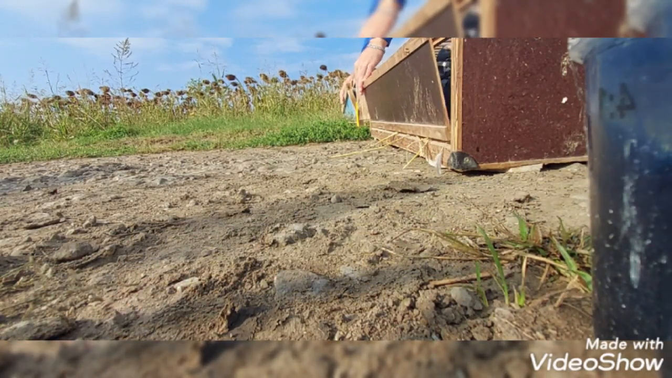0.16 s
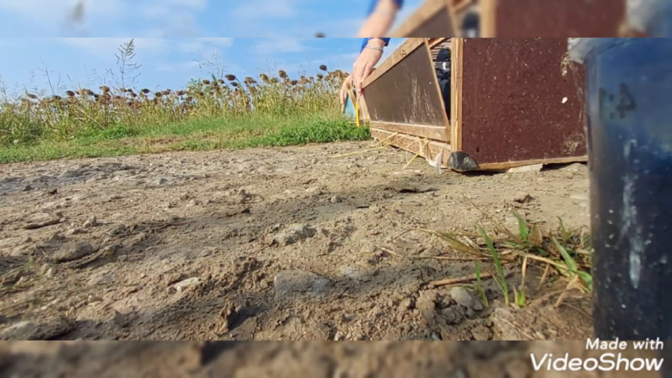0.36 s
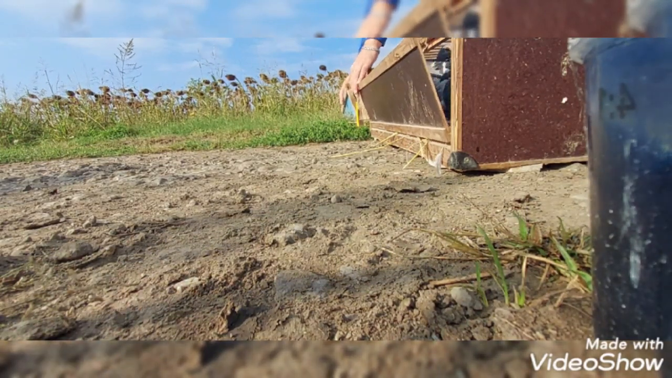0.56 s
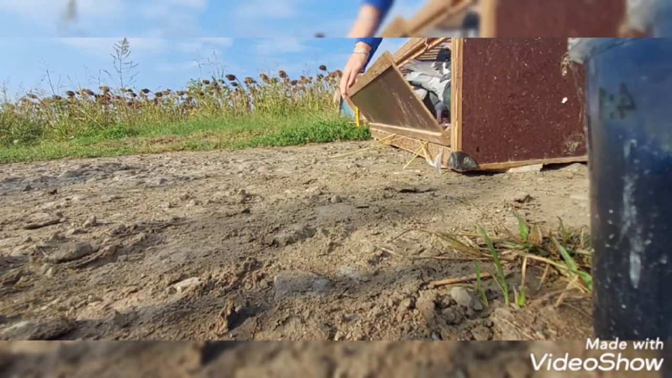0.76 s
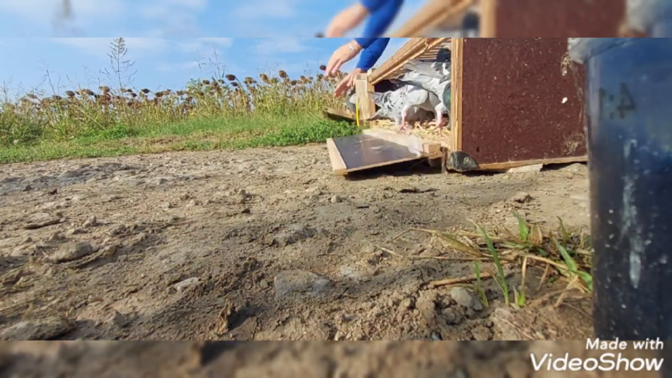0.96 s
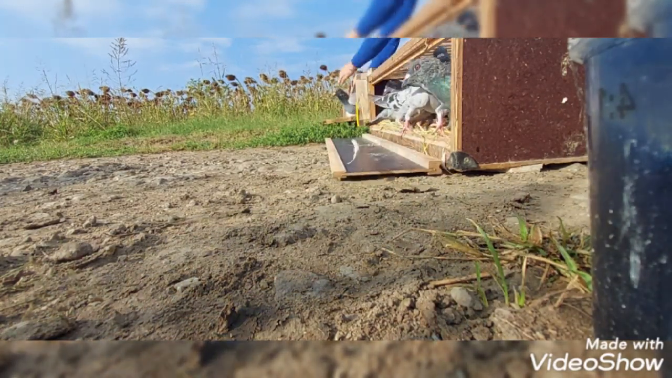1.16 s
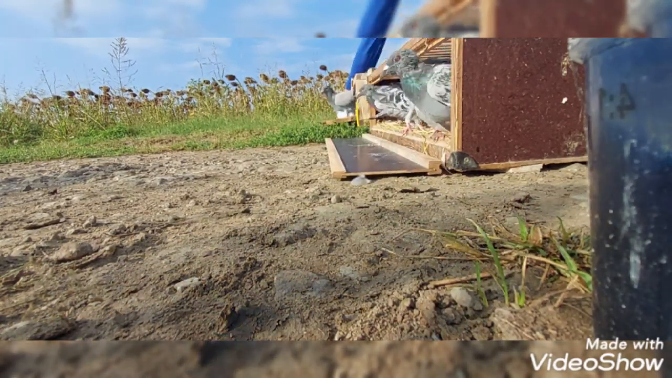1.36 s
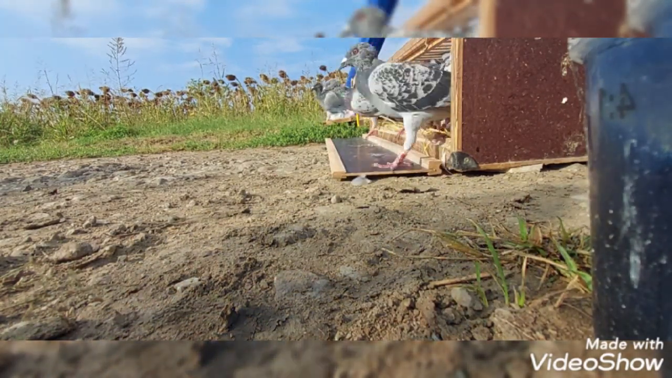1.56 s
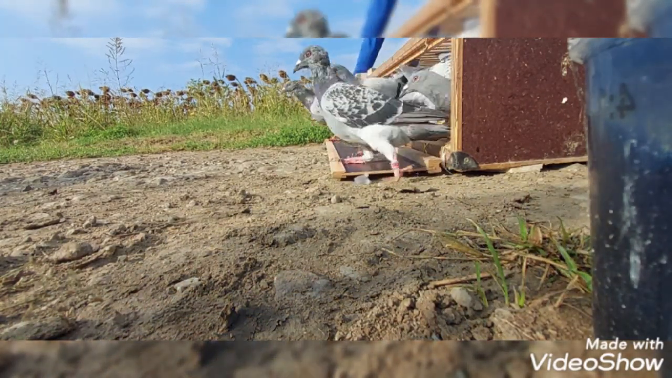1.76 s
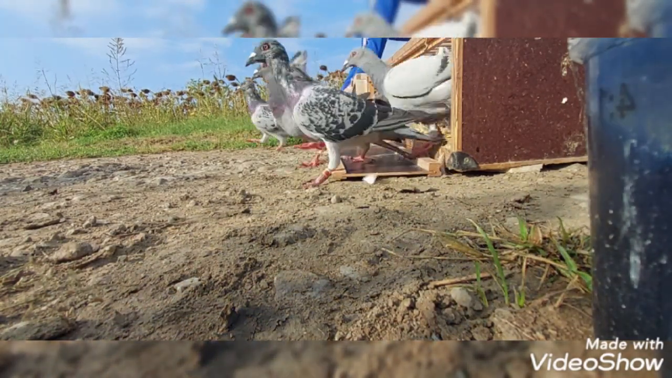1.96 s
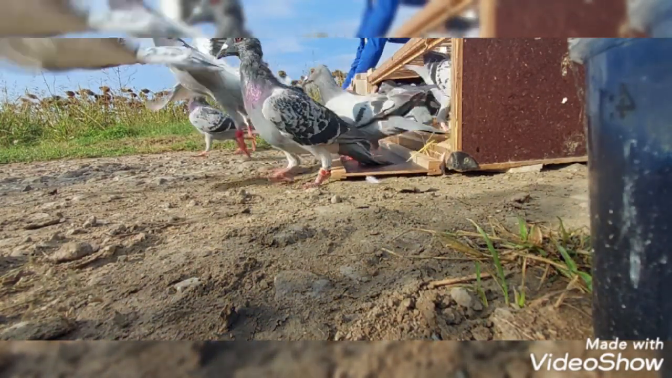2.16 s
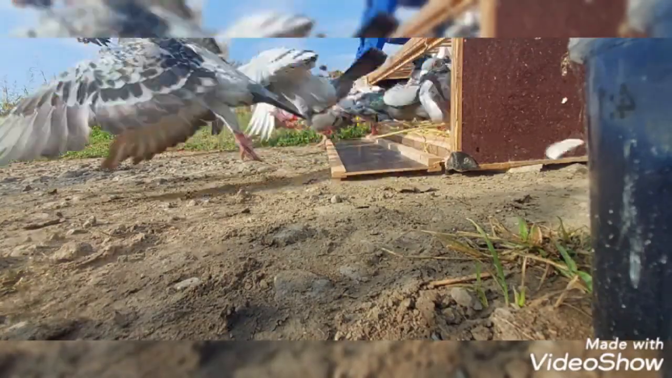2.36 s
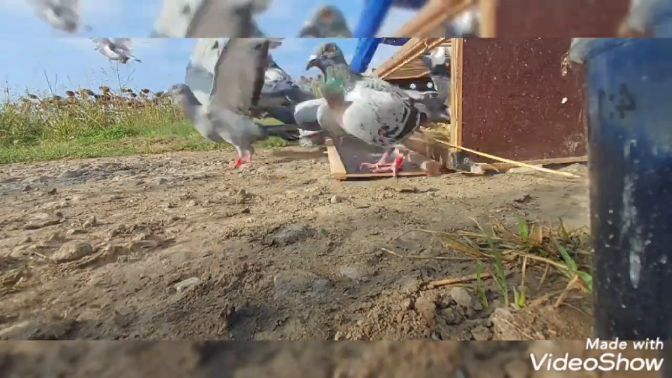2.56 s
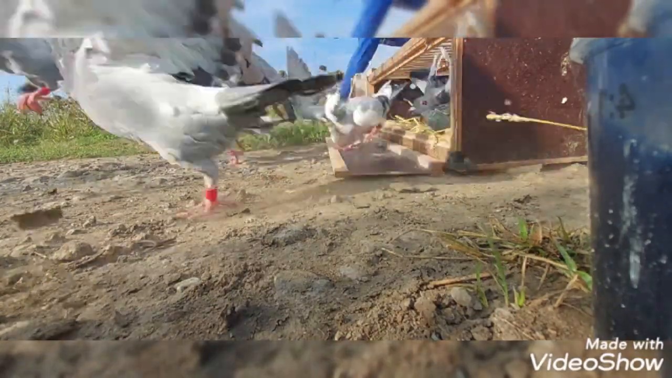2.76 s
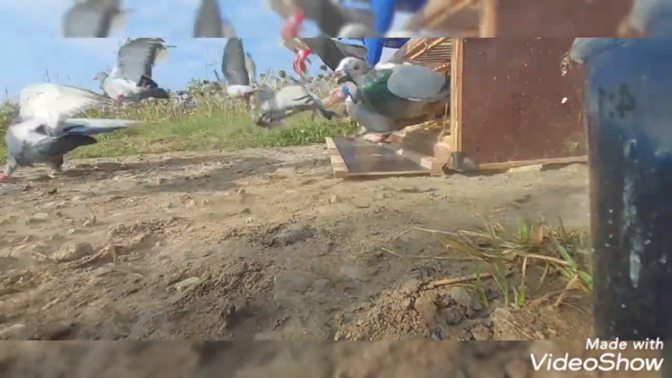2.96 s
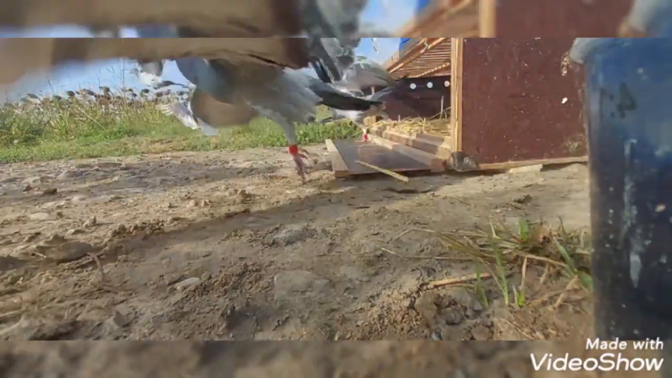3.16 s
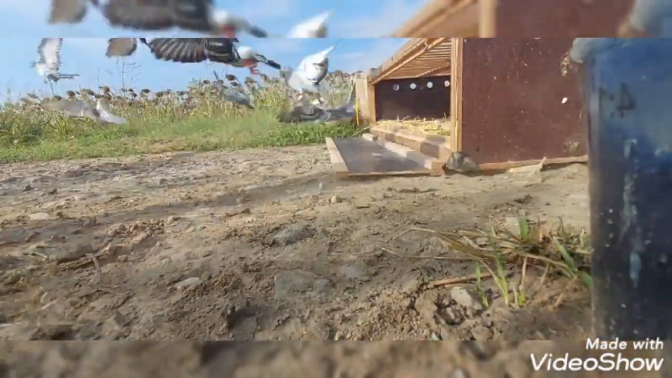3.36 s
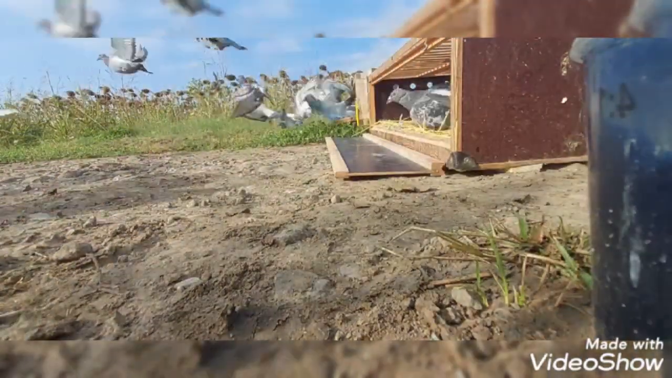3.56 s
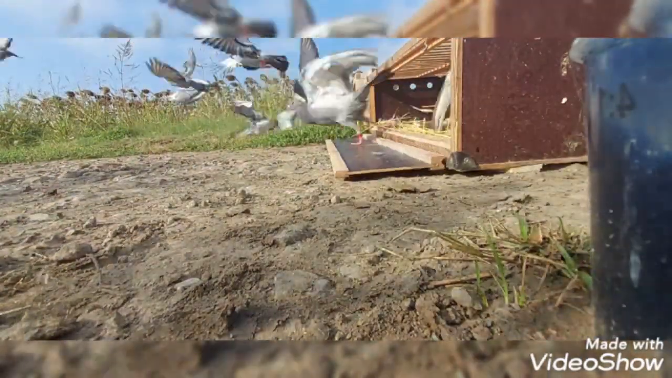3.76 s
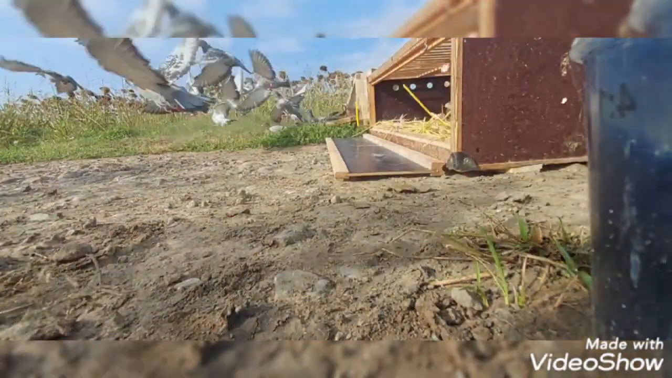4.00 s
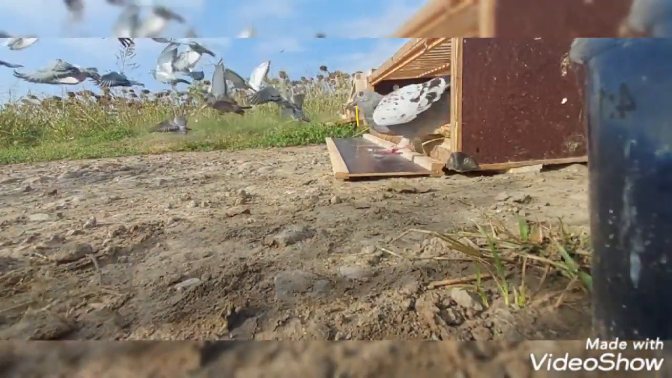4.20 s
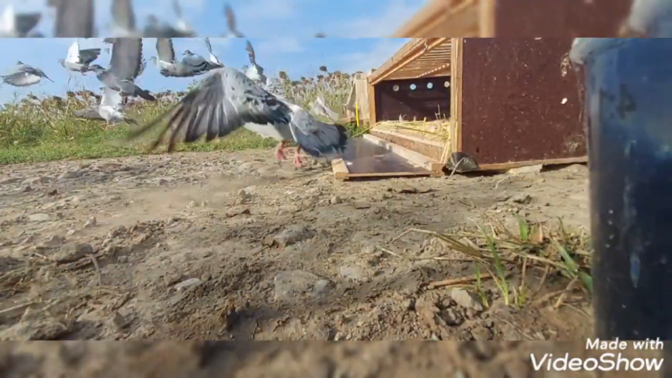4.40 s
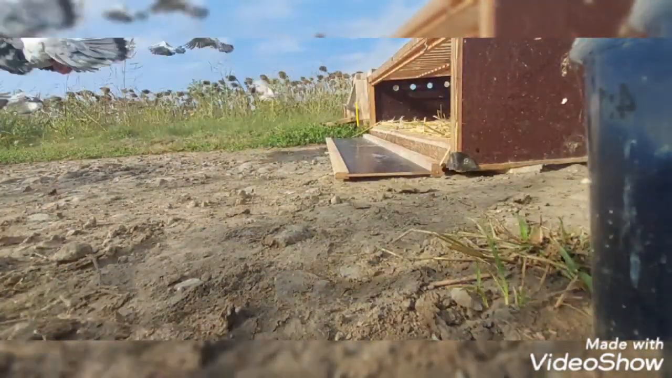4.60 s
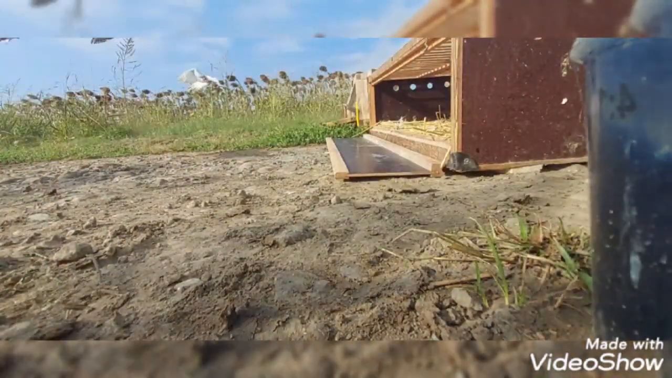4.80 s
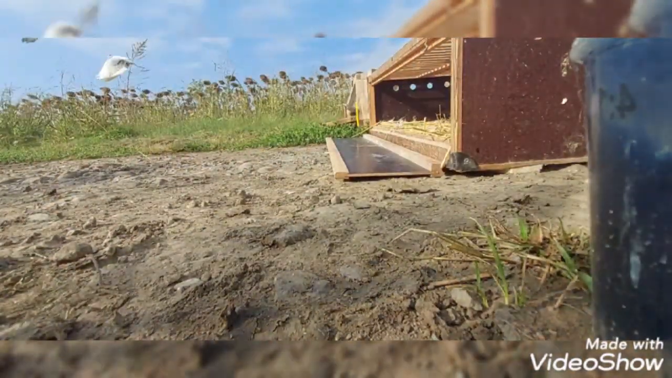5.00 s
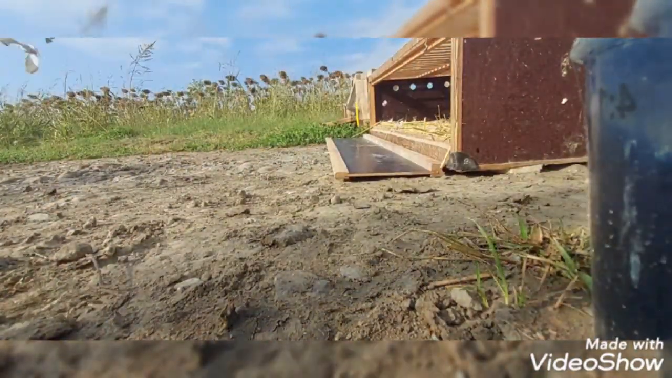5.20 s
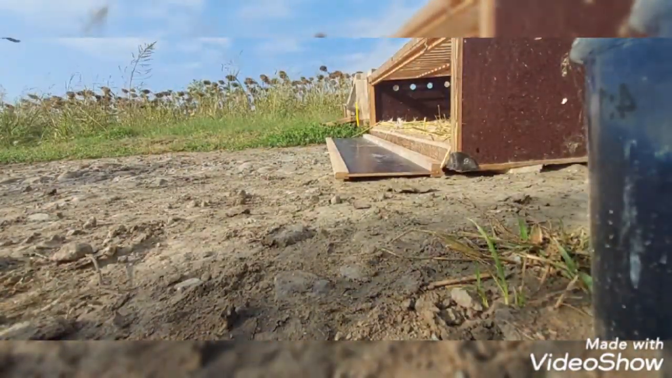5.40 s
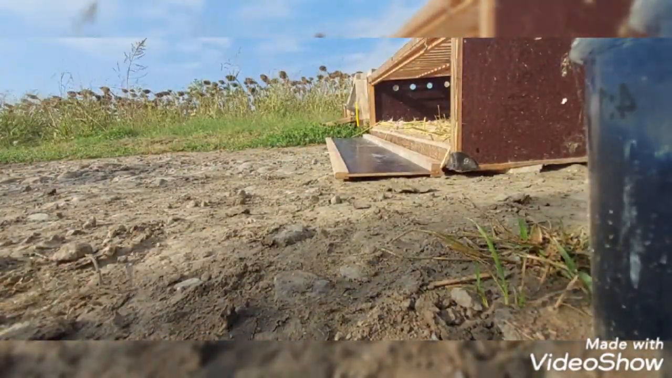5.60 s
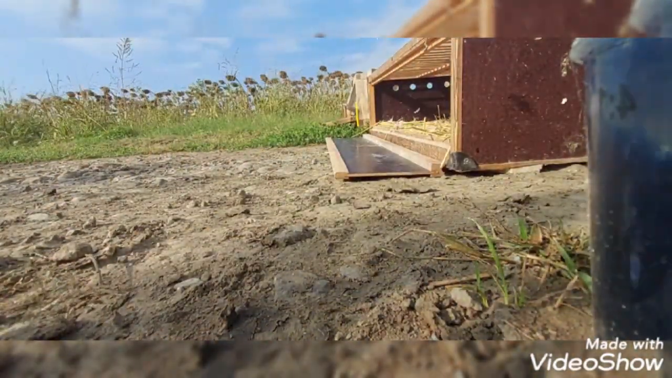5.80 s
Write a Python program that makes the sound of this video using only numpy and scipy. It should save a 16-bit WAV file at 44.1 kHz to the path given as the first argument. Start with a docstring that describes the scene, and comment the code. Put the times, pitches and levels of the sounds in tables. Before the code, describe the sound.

A close stereo pickup in an open field, with faint low wind and soft airy hush. A light wooden knock comes at 0.1 s, then the crate door scrapes from 0.7 s, with a firm knock at 0.8 s. At about 1.0 s the board clacks hard on the soil, bouncing and rattling briefly with a hollow crate resonance. From 1.3 to 2.1 s, feet knock on wood, claws scratch and birds rustle. Around 2.2 s the pigeons burst out: hard wing slaps, papery feather flutter and a heavy push of air, strongest near 2.4 s. Overlapping waves of wingbeats continue through 3 and 4 s, gusts buffeting the microphone, brighter and stronger on the left, more muffled on the right. Late departures flap near 4.5 to 5 s, with small snaps and pattering grit. A last weak gust at 5.3 s and soft scuffs lead to near quiet by 5.8 s.

```python
"""Racing pigeons leave a wooden crate on bare ground, heard from close by on two ports, the right one facing away.
First the low rumble of a light wind and the field's hush; then the door, as damped board modes, knocks, scrapes
and drops on the soil. Claws scratch the wood as filtered noise bursts while the birds jostle, then the flock takes
off in waves with a low push of air: grainy noise makes feathers swish and flutter, short pulses and bursts make
slaps and snaps, and each near downstroke throws a gust of shaped turbulence on both ports, until all dies down."""
import sys
import numpy as np
from scipy import signal
from scipy.fft import rfft, irfft, next_fast_len
from scipy.io import wavfile
from scipy.ndimage import uniform_filter1d

SR = 44100
rng = np.random.default_rng(int(sys.argv[2]) if len(sys.argv) > 2 else 0)


def unload_wav(signal):
    """Save mono or channel-first audio to the path in sys.argv[1] as 16-bit WAV at rate SR, clipped to [-1, 1]."""
    wavfile.write(
        sys.argv[1],
        SR,
        np.round(np.clip(np.atleast_2d(signal).T, -1, 1) * 32767).astype(np.int16),
    )


N = 257984
TIME = np.arange(N) / SR

# All levels are relative: mix and port gains follow. A decay is the time to fall to 1/e.
# Background. Low rumble common to both ports: light wind, with a push of air from the wings
# at take-off near 2.3 s: (t/s, level/dB)
RUMBLE = [(0, -34.5), (0.6, -42.5), (0.75, -35.5), (1.85, -39.5), (2.3, -25), (2.45, -42), (5.55, -51),
          (5.8, -64)]
# One swell in the hush of the field: (middle t/s, half width/s, level/dB)
HUSH_SWELL = (0.38, .1, 5.8)
# Air stirred by the whole flock: (t/s, left level/dB, right level/dB)
DRAFT = [(1.85, -61, -82), (2.35, -16.5, -31), (2.5, -11.5, -32), (2.66, -26, -30), (2.92, -19, -19),
         (3.6, -19.5, -19), (4.1, -25, -21), (4.4, -31, -23.5), (4.63, -22, -19), (4.78, -26, -21),
         (5.08, -31, -19), (5.18, -31.5, -30.5), (5.35, -30.5, -22), (5.67, -60, -35), (5.8, -49, -45.5)]
# Soft scuffs on wood and soil: (start t/s, end t/s, level/dB)
SCUFFS = [(5.206, 5.306, -29.5), (5.563, 5.7, -34.5)]

# Crate. Claws scratch over plywood and straw, and wings brush the crate at 2.22-2.32 s:
# (t/s, level/dB, centre f/Hz, decay/s)
SCRATCHES = [(0.8334, -34, 3740, 0.0038), (0.8635, -32.5, 1520, 0.0079), (0.975, -42.5, 4300, 0.043),
             (1.194, -38, 4500, .004), (1.430, -41, 3280, .003), (1.543, -30.5, 1940, 0.0091),
             (1.551, -25.5, 5000, .0032), (1.6032, -25.5, 3650, 0.0087), (1.706, -32.5, 3170, 0.028),
             (1.7596, -20.5, 4040, 0.0024), (1.8148, -25.5, 4550, 0.0042), (1.908, -24.5, 3570, 0.0086),
             (1.9368, -25, 4000, 0.0036), (2.1356, -24.5, 4630, 0.0041), (2.1923, -23.5, 3900, 0.012),
             (2.221, -21, 1250, 0.016), (2.303, -23, 4130, 0.039), (2.3223, -20, 1160, 0.018)]
# Rubs in the crate: the door's scrape as it opens, then birds jostling inside: (start t/s, end t/s, level/dB)
RUBS = [(0.715, 1.236, -44), (1.42, 1.628, -46.5), (1.682, 2.184, -40)]
# Door and feet knock on the wood: (t/s, level/dB, main f/Hz, t60/s)
KNOCKS = [(0.130, -21.5, 606, 0.012), (0.698, -30, 630, 0.025), (0.836, -9, 597, 0.013),
          (1.313, -22.5, 304, 0.04), (1.3721, -10.5, 700, 0.011), (1.741, -8.5, 1030, 0.014),
          (1.879, -13.5, 482, 0.018), (2.053, -19, 880, 0.039)]
# Door hits the ground and rebounds: (t/s, clack level/dB, board thud level/dB, crate boom level/dB)
SLAM = [(1.0226, 1, -15, -47), (1.0254, -2.5, -14, -20), (1.050, -18, -20, -15.5),
        (1.088, -16.5, -17.5, -25), (1.105, -40, -33, -21), (1.139, -21.5, -22, -19)]
# Ringing modes of the door panel and of the crate: (f/Hz, level/dB, t60/s)
DOOR_MODES = [(775, -12.5, 0.18), (1320, -6, 0.022), (1370, 0, 0.032), (1564, -5, 0.048), (1980, -7, 0.012),
              (2030, -6, 0.015), (2595, -6.5, 0.04), (3200, -25, .02), (3720, -29, 0.019),
              (4100, -21, 0.03)]
CRATE_MODES = [(281.6, 0, 0.27), (317.5, -4, 0.37), (373, -8, 0.35), (457, -14, 0.94), (535.4, 3.5, 0.086),
               (634, -25, 0.11), (845, -8, 0.2), (1050, -6, 0.13)]

# Flock. How busy and near it is: (t/s, feather hiss level/dB)
FLOCK = [(0.6, -97), (1.0, -52.5), (1.65, -51), (2.1, -41.5), (2.37, -29), (2.45, -43), (2.68, -40),
         (2.81, -45.5), (2.86, -29.5), (3.3, -36.5), (3.58, -39.5), (3.85, -34.5), (4.45, -36), (5.0, -41),
         (5.5, -48), (5.68, -48), (5.76, -57)]
# Sharp wing claps and snapping straw: (t/s, treble level/dB, body over treble/dB)
SNAPS = [(1.3751, -36, 4.5), (2, -23, -35), (2.2201, -29, 10.5), (2.2478, -18.5, 2.5), (2.379, -17.5, -11),
         (2.618, -30, -7), (3.119, -29.5, 4), (3.7718, -22, -4), (4.138, -26.5, -2.5), (4.744, -28, -3),
         (4.8949, -24, -29), (5.0933, -27.5, -17), (5.119, -27, -5), (5.2181, -19.5, -9.5),
         (5.4511, -37, -8)]
# Wings slap the air at the start of a hard stroke: (t/s, level/dB)
SLAPS = [(2.178, -8.5), (2.2197, -4.5), (2.361, 4.5), (2.487, -18), (2.749, -7.5), (2.790, -4.5),
         (2.978, -15), (3.062, 2), (3.231, -6), (3.343, -3.5), (3.411, -23), (3.448, -3), (3.646, -5),
         (4.518, -3), (4.821, -19)]
# Departing waves; near strokes of one wave share speed and distance:
# (start t/s, base eddy f/Hz, swish over left gust/dB, feather hiss over left gust/dB)
WAVES = [(2.1, 420, -7, -14.5), (2.39, 225, -23, -36), (2.83, 470, -7, -38), (3.28, 440, -15, -48),
         (3.75, 345, -18, -16), (4.48, 435, -16, -40), (4.75, 313, -36, -28)]
# Downstrokes close enough to blow on the ports: (middle t/s, length/s, left level/dB, right level/dB)
STROKES = [(2.195, 0.034, -17.5, -21), (2.365, 0.0087, -7.5, -2.5), (2.409, 0.021, -6.5, -35),
           (2.451, 0.025, -11, -29), (2.521, 0.026, -6.5, -21), (2.561, 0.029, -14.5, -25.5),
           (2.73, 0.035, -12.5, -30), (2.77, 0.022, -18, -28), (2.902, 0.033, -13, -12),
           (2.941, 0.046, -22, -14.5), (2.988, 0.02, -9.5, -34), (3.029, 0.029, -15.5, -19),
           (3.084, 0.024, -9, -24), (3.125, 0.023, -14.5, -20), (3.18, 0.029, -17, -24),
           (3.263, 0.049, -21, -22), (3.303, 0.025, -15, -22), (3.357, 0.026, -17, -16.5),
           (3.414, 0.021, -15, -14), (3.467, .029, -10, -12), (3.551, 0.048, -14.5, -25),
           (3.599, 0.023, -16.5, -16), (3.655, 0.043, -18.5, -12.5), (3.819, 0.044, -17.5, -31),
           (3.922, 0.055, -24, -19.5), (4.129, 0.025, -16, -20), (4.255, 0.044, -19, -15),
           (4.437, 0.055, -18.5, -20), (4.54, 0.044, -11, -17.5), (4.667, 0.034, -10, -13.5),
           (4.824, 0.016, -14.5, -37), (4.984, 0.058, -15, -24.5), (5.29, 0.033, -21.5, -28)]

# Noise spectra, only their shape matters unless stated: (f/Hz, level/dB)
RUMBLE_COLOUR = [(20, -39), (33, -34), (45, -2.5), (60, -2), (130, -4.5), (230, -3.5), (400, -17),
                 (900, -23.5), (3000, -53.5)]
AIR_COLOUR = [(60, -5), (400, -16), (850, 6.5), (1300, 10), (1900, 0), (2350, -10.5), (5000, -6.5),
              (7000, -11), (16000, -27)]
DRAFT_COLOUR = [(20, -23), (33, -47), (48, 3), (75, 1), (125, 5.5), (180, -6.5), (280, 3), (500, -5.5),
                (900, -16), (1500, -44.5), (4000, -79)]
SCUFF_COLOUR = [(150, -19), (400, 12), (900, 6), (1700, 4.5), (2700, -1), (3800, -12), (5500, -12.5),
                (9000, -31)]
RATTLE_COLOUR = [(170, -32), (280, 20), (550, 13), (750, -10), (1100, 6), (2000, -3), (3500, -20),
                 (5500, -21), (9000, -47)]
CRACK_COLOUR = [(300, -29), (800, -6), (1250, 2.5), (1700, 1), (2100, -5.5), (2700, -15), (4500, -15),
                (6000, -53), (15000, -63)]
SWISH_COLOUR = [(100, -58), (400, 7.5), (900, 6), (1400, -2), (1800, -6), (2800, -10), (4500, -10),
                (9000, -49)]
HISS_COLOUR = [(500, -11), (2000, 3), (3200, -3.5), (5000, -0.5), (6500, -4.5), (10000, -10.5),
               (15500, -1.5)]
SNAP_COLOUR = [(500, 9.5), (2500, -25), (5200, 9), (7000, -1), (11000, -3.5), (16000, 1)]
CLAP_COLOUR = [(150, -26), (500, 10), (1200, 6), (2600, 1.5), (4500, -2), (9000, -50)]
FLAP_COLOUR = [(150, -40), (400, 8), (900, 14), (1400, 5), (1900, -5.5), (2800, -11.5), (4500, -18),
               (9000, -58)]
# Microphones: right port facing away, gain of both ports, hiss as gain on white noise: (f/Hz, level/dB)
SHADOW = [(200, 5.5), (500, -2.5), (1000, -14), (2000, -16.5), (3200, -23), (4700, -30), (8000, -36),
          (15000, -19.5)]
PORT_COLOUR = [(1250, -0.5), (1450, -5), (1620, 3), (2000, -0.5), (5700, -2), (6600, -9), (7800, -17),
               (9000, -8.5), (10800, -0.5), (16000, -6.5)]
SELF_NOISE = [(100, -70), (5500, -85), (7500, -67.5), (10500, -73), (16000, -66)]

RUB_FADE_S = 0.04
CONTACT_S, CRACK_T60_S = 0.0026, 0.045
SWISH_OVER_HISS_DB = 5.5
SWISH_LEAD_S, SWISH_SHARE = 0.0029, 0.65  # feathers peak just ahead of the gust and last part of its length
EDDY_OCTAVES_PER_DB, USUAL_STROKE_DB = -0.0966, -17  # a stronger stroke has slower eddies
CEILING, EDGE_HZ = 0.9, 16100  # soft overload (full scale 1) and band limit


def amp(db):
    """Turns dB into an amplitude factor."""
    return 10 ** (np.asarray(db) / 20)


def unit(x):
    """Scales to an rms of 1."""
    return x / np.sqrt(np.mean(x ** 2, axis=-1, keepdims=True) + 1e-20)


def curve(rows, column):
    """Gain over time from one dB column of a table."""
    rows = np.array(rows)
    return amp(np.interp(TIME, rows[:, 0], rows[:, column]))


def add(mix, s, sound):
    """Mixes a sound in at time s."""
    part = mix[..., max(round(s * SR), 0):][..., :sound.shape[-1]]
    part += sound[..., :part.shape[-1]]


def colour(x, points):
    """Filters by a spectrum of (f/Hz, level/dB) points, joined along log frequency."""
    size = next_fast_len(x.shape[-1])
    hz, db = np.transpose(points)
    log_hz = np.log(np.fft.rfftfreq(size, 1 / SR) + 1)
    gain = amp(np.interp(log_hz, np.log(hz), db))
    return irfft(rfft(x, size) * gain, size)[..., :x.shape[-1]]


def waver(shape, hz):
    """Smooth chance of rms 1 that moves about hz times a second."""
    width = max(int(SR / hz), 1)
    smooth = uniform_filter1d(rng.standard_normal(shape), width, mode="wrap")
    return unit(uniform_filter1d(smooth, width, mode="wrap"))


def at_ports(x, lead=18):
    """Sound from the left front reaches the right port lead samples later and duller."""
    return np.array([x, colour(np.roll(x, round(lead)), SHADOW)])


def patchy(x, depth_db, width_hz=450, length=.016):
    """Each feather has its own brief colour: random patches over time and frequency."""
    z = signal.stft(x, nperseg=512)[2]
    field = rng.standard_normal(z.shape)
    field = uniform_filter1d(field, max(round(width_hz * 512 / SR), 1), axis=0)
    field = uniform_filter1d(field, max(round(length * SR / 256), 1), axis=1)
    return signal.istft(z * amp(depth_db * field / field.std()), nperseg=512)[1][:N]


def feathers(points, grain_db, patch_db=3.0):
    """Vanes slide over each other in tiny catches: noise in grains of about a millisecond."""
    noise = patchy(rng.standard_normal(N), patch_db)
    return unit(colour(noise * amp(grain_db * waver(N, 1060)), points))


def ring(modes, pitch=1):
    """Damped modes of a struck board."""
    t = np.arange(SR // 2) / SR
    return sum(amp(db - 60 * t / t60) * np.sin(2 * np.pi * hz * pitch * t) for hz, db, t60 in modes)


def thud(hz, t60):
    """A damped knock on a board: four modes around hz, softened at the start, with a peak of 1."""
    board = ring([(.75, 2.5, t60), (1, 13, t60), (1.3, 5.5, t60), (1.8, 0.5, t60)], hz)
    board = board * (1 - np.exp(-np.arange(len(board)) / SR / 0.0035))
    return board / abs(board).max()


def outdoors(air_db=-52, apart=0.26):
    """Low rumble of wind and wing push, mostly common to both ports, and the open field's swelling hush."""
    common = rng.standard_normal(N)
    rumble = unit(colour(common + apart * rng.standard_normal((2, N)), RUMBLE_COLOUR))
    middle, width, db = HUSH_SWELL
    hush_level = amp(air_db + db * np.exp(-((TIME - middle) / width) ** 2))
    hush = hush_level * unit(colour(rng.standard_normal(N), AIR_COLOUR))
    return rumble * curve(RUMBLE, column=1) + at_ports(hush)


def draft(left_db=0., right_db=-0.5, lumpy_db=4.5):
    """Stirred air tumbles over each port on its own, with another colour on the sheltered one."""
    lumps = amp(lumpy_db * waver((2, N), 38))
    air = unit(colour(rng.standard_normal((2, N)), DRAFT_COLOUR) * lumps)
    air[1] = unit(colour(air[1], [(150, 3.5), (300, -4.0), (600, -32.5), (1500, 19.5)]))
    return air * np.array([amp(left_db) * curve(DRAFT, column=1), amp(right_db) * curve(DRAFT, column=2)])


def scuffs():
    """Gritty rubs, grainy noise apart on each port, that swell and stop."""
    level = np.zeros(N)
    for start, end, db in SCUFFS:
        corners = [start, (start + end) / 2, end - .02, end]
        level += amp(db) * np.interp(TIME, corners, [0.00077, 0.58, 0.53, 0.04])
    return level * np.array([feathers(SCUFF_COLOUR, grain_db=2.0) for port in range(2)])


def grit(per_s=45, level_db=-39, spread_db=5.5, decay=0.0023):
    """Soil and chaff thrown up by the wings patter down in faint ticks of decaying noise."""
    falling = np.interp(TIME, [.8, 2.2, 5.1, 5.75], [0.09, 1.05, 1.5, 0])
    size = amp(spread_db * np.minimum(rng.exponential(1, N), 2.5))
    hits = size * (rng.random(N) < per_s / SR)
    bursts = signal.lfilter([1], [1, -np.exp(-1 / (decay * SR))], hits * falling)
    return amp(level_db) * bursts * unit(colour(rng.standard_normal(N), SNAP_COLOUR))


def scratches(sharpness=2.12, skirt_db=-25, grain_db=0.5):
    """A claw or wing catches suddenly, then skids in tiny slips that ring what it touches."""
    out, t = np.zeros(N), np.arange(8192) / SR
    f = np.fft.rfftfreq(len(t), 1 / SR) + 1
    for s, db, hz, decay in SCRATCHES:
        slips = rng.standard_normal(len(t)) * amp(grain_db * waver(len(t), 1500))
        peak = 1 / (1 + (sharpness * np.log(f / hz)) ** 4)
        skirt = amp(skirt_db) * np.minimum(f / hz, hz / f)
        skid = unit(irfft(rfft(slips) * (peak + skirt)))
        add(out, s, amp(db) * skid * np.exp(-t / decay))
    return out


def crate_rubs(restless_db=1.5, restless_hz=30, ticks_per_s=16, tick_db=-40, tick_decay=0.0022, hiss_db=-15):
    """The door scrapes open, then birds jostle inside: grainy noise with random ticks."""
    level = np.zeros(N)
    for start, end, db in RUBS:
        inside = np.minimum(TIME - start, end - TIME)
        level += amp(db) * np.clip(inside / RUB_FADE_S + .5, 0, 1)
    rubs = feathers(SWISH_COLOUR, grain_db=5.5) + amp(hiss_db) * feathers(HISS_COLOUR, grain_db=1.0)
    rubs = amp(restless_db * waver(N, restless_hz)) * rubs
    hits = rng.random(N) * (rng.random(N) < ticks_per_s / SR)
    bursts = signal.lfilter([1], [1, -np.exp(-1 / (tick_decay * SR))], hits)
    ticks = amp(tick_db) * bursts * unit(colour(rng.standard_normal(N), HISS_COLOUR))
    return level * rubs + (level > 0) * ticks


def knocks(splinter_db=-16, crate_db=-21):
    """A short damped thud of the board, a rough edge, and a little ring from the box."""
    out, t = np.zeros(N), np.arange(SR // 2) / SR
    for s, db, hz, t60 in KNOCKS:
        edge = unit(colour(rng.standard_normal(len(t)), SWISH_COLOUR)) * amp(-60 * t / t60)
        add(out, s, amp(db) * (thud(hz, t60) + amp(splinter_db) * edge + amp(crate_db) * ring(CRATE_MODES)))
    return out


def door(crack_db=-5, rattle_db=-22, rattle_t60=0.4, thud_t60=0.18, board_hz=980, board_t60=0.043):
    """The plywood door cracks on the soil, rattles at its hinge and shakes the crate."""
    out, t = np.zeros(N), np.arange(SR // 2) / SR
    for s, clack_db, board_db, boom_db in SLAM:
        chatter = rng.standard_normal(len(t)) * amp(2.2 * waver(len(t), 280))
        rattle = unit(colour(chatter, RATTLE_COLOUR)) * amp(rattle_db - 60 * t / rattle_t60)
        crack = unit(colour(rng.standard_normal(len(t)), CRACK_COLOUR)) * amp(crack_db - 60 * t / CRACK_T60_S)
        panel = ring(DOOR_MODES, pitch=rng.uniform(0.96, 1.02)) * (1 - np.exp(-t / CONTACT_S))
        frame = ring([(288.5, -2.5, thud_t60), (406, -7.0, thud_t60)])  # the frame gives briefly
        add(out, s, amp(clack_db) * (.5 * panel + crack + rattle))
        add(out, s, amp(board_db) * thud(board_hz * rng.uniform(.93, 1.08), board_t60))
        add(out, s, amp(boom_db) * (0.44 * ring(CRATE_MODES) + 0.49 * frame))
    return out


def wingbeats(count=4, beats_hz=9., decay=0.014, spread_db=1.5):
    """Birds beat out of step, each stroke a quick rise and a short fall."""
    power = np.zeros(N)
    for bird in range(count):
        pace = rng.uniform(.85, 1.2) + 0.0804 * waver(N, 4.2)
        turns = rng.random() + np.cumsum(beats_hz * pace) / SR
        age = (turns % 1) / beats_hz
        stroke = (1 - np.exp(-age / 0.00093)) * np.exp(-age / decay)
        power += (amp(spread_db * waver(N, 5.1)) * stroke) ** 2
    return unit(np.sqrt(power))


def wings(steady=0.84, beating=0.41, swish_beating=0.38):
    """The overlapping beats of the whole flock: a swish with a feather hiss on top."""
    beat = wingbeats()
    swish = np.hypot(steady, swish_beating * beat) * feathers(SWISH_COLOUR, grain_db=7.0)
    hiss = np.hypot(steady, beating * beat) * feathers(HISS_COLOUR, grain_db=2.0)
    return curve(FLOCK, column=1) * (amp(SWISH_OVER_HISS_DB) * swish + hiss)


def snaps(level_db=8.5, decay=0.0023, tail_db=-22, tail_decay=0.0051):
    """Sharp noise claps, each with a brief tail for the scatter off the ground and the crate."""
    out, t = np.zeros(N), np.arange(SR // 10) / SR
    fall = np.exp(-t / decay) + amp(tail_db) * np.exp(-t / tail_decay)
    shape = amp(level_db) * (1 - np.exp(-t / 0.0001)) * fall
    for s, db, body_db in SNAPS:
        treble = unit(shape * colour(rng.standard_normal(len(t)), SNAP_COLOUR))
        body = unit(shape * colour(rng.standard_normal(len(t)), CLAP_COLOUR))
        add(out, s, amp(db) * np.sqrt(np.mean(shape ** 2)) * (treble + amp(body_db) * body))
    return out


def slaps(push=0.00035, edge=0.00004, flutter_db=-11, flutter_decay=0.01):
    """A push of air with its suck-back, then the quills flutter."""
    out, t = np.zeros(N), np.arange(SR // 10) / SR
    for s, db in SLAPS:
        u = t / (push * rng.uniform(0.7, 2.3))
        pulse = (1 - u) * np.exp(-u) * (1 - np.exp(-(t / edge) ** 2))
        noise = unit(colour(rng.standard_normal(len(t)), SWISH_COLOUR))
        flutter = noise * amp(flutter_db) * np.exp(-t / flutter_decay)
        add(out, s, amp(db) * (pulse / pulse.max() + flutter))
    return colour(out, [(60, -52), (300, 4.5), (1500, -6), (4000, -55), (9000, -25)])


def wave_at(s):
    """Base eddy rate, swish and hiss of the wave that is passing at time s."""
    started = sum(start <= s for start, *_ in WAVES)
    return WAVES[max(started - 1, 0)][1:]


def swell(t, length, rise=0.7):
    """One stroke around t = 0, length at half power: it builds faster than it fades."""
    t = t + 0.12 * length
    side = length * np.where(t < 0, rise, 2 - rise)
    return 1.25 * np.exp(-2 * np.log(2) * (t / side) ** 2)


def quills(per_s=68, uneven=.3, decay=0.0035, between=0.37):
    """The long feathers flick past one after another: each a sharp start and a quick fall."""
    turns = np.cumsum(per_s * np.exp(uneven * waver(N, per_s))) / SR
    return unit(between + np.exp(-(turns % 1) / per_s / decay))


def flaps():
    """The feathers of each near downstroke flutter like paper: flicked swish plus hiss."""
    swish, hiss, t = np.zeros(N), np.zeros(N), np.arange(-SR // 10, SR // 10) / SR
    for s, length, left_db, _ in STROKES:
        _, swish_db, hiss_db = wave_at(s)
        stroke = amp(left_db) * swell(t + SWISH_LEAD_S, SWISH_SHARE * length)
        add(swish, s + t[0], amp(swish_db) * stroke)
        add(hiss, s + t[0], amp(hiss_db) * stroke)
    flutter = swish * quills() * feathers(FLAP_COLOUR, grain_db=3.0, patch_db=2.0)
    return flutter + hiss * feathers(HISS_COLOUR, grain_db=2.5)


def eddies(t, length, centre_hz, rise=0.44, fall=3.5, lumpy_db=4.0, low_hz=60):
    """Turbulence on a port: strongest near the eddy rate, then falling steeply."""
    f = np.fft.rfftfreq(len(t), 1 / SR)
    u = f / centre_hz
    push = rng.standard_normal(len(t)) * amp(lumpy_db * waver(len(t), 256)) * swell(t, length)
    low_cut = f ** 2 / (f ** 2 + low_hz ** 2)
    puff = irfft(rfft(push) * u ** rise / np.sqrt(1 + u ** (2 * fall)) * low_cut, len(t))
    return puff / np.sqrt(np.sum(puff ** 2) / (length * SR))  # rms 1 over the stroke's length


def gusts(left_corner=1.35, right_corner=0.59):
    """Each near downstroke blows fast eddies on the left port, slower ones on the sheltered right."""
    out, t = np.zeros((2, N)), np.arange(-8192, 8192) / SR
    for s, length, left_db, right_db in STROKES:
        hz = wave_at(s)[0] * 2 ** (EDDY_OCTAVES_PER_DB * (left_db - USUAL_STROKE_DB))
        add(out[0], s + t[0], amp(left_db) * eddies(t, length, hz * left_corner))
        add(out[1], s + t[0], amp(right_db) * eddies(t, length, hz * right_corner))
    return out


def scene(crate_left_db=0.5, crate_right_db=1.0):
    """The crate in front, the flock passing on the left, and the air it throws on the ports."""
    small_boards = signal.butter(4, 215, "high", fs=SR, output="sos")  # they radiate little bass
    wood = signal.sosfilt(small_boards, knocks() + door())
    crate = at_ports(wood + scratches() + crate_rubs(), lead=12.8)
    crate[0] = amp(crate_left_db) * crate[0]
    crate[1] = colour(crate[1], [(300, -0.83), (1000, crate_right_db)])  # ahead, so a little less shaded
    flock = at_ports(wings())
    flock[1] = 0.68 * flock[1] + 1.4 * colour(wings(), SHADOW)  # birds on all sides make the ports differ
    near = at_ports(flaps() + snaps() + slaps() + grit(), lead=21.4)
    return outdoors() + draft() + scuffs() + crate + flock + near + gusts()


def record(dry):
    """The ports' colour, the microphones' own hiss, soft overload and the band limit."""
    x = colour(dry, PORT_COLOUR) + colour(rng.standard_normal((2, N)), SELF_NOISE)
    x = x / (1 + (x / CEILING) ** 6) ** (1 / 6)
    lowpass = signal.firwin(255, EDGE_HZ, window=("kaiser", 9), fs=SR)
    return signal.oaconvolve(x, lowpass[None], "same")


dry = scene()
out = record(dry)
unload_wav(out)
```